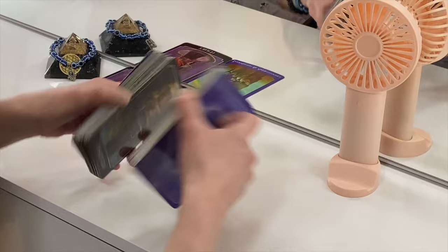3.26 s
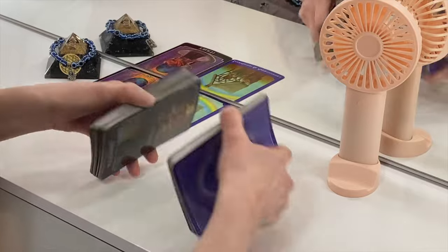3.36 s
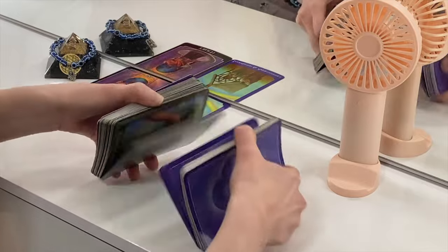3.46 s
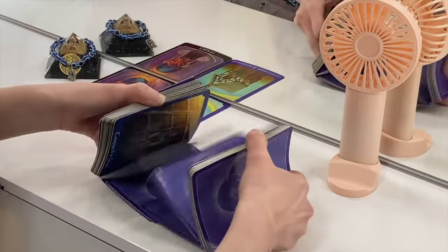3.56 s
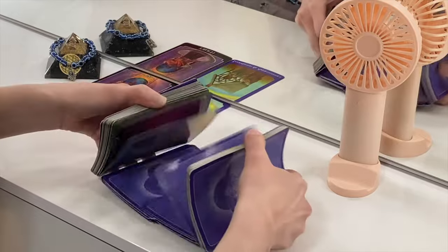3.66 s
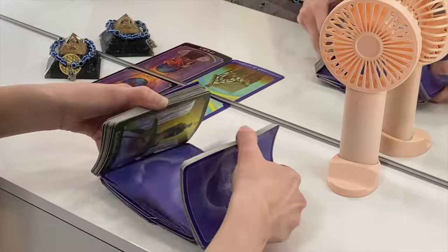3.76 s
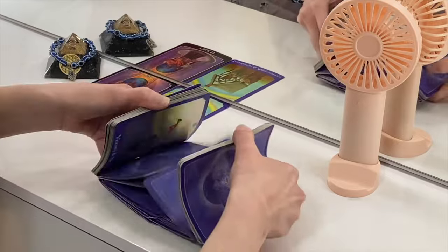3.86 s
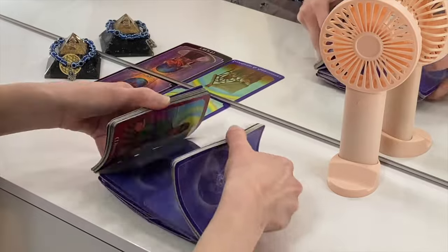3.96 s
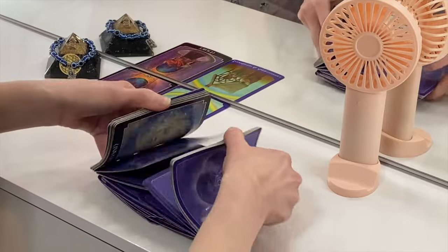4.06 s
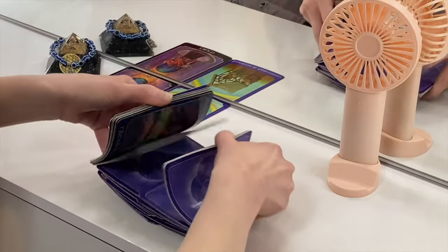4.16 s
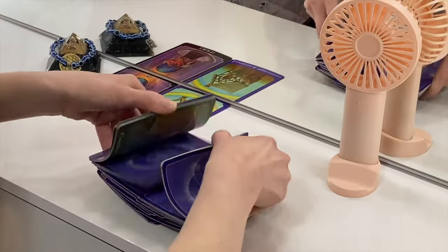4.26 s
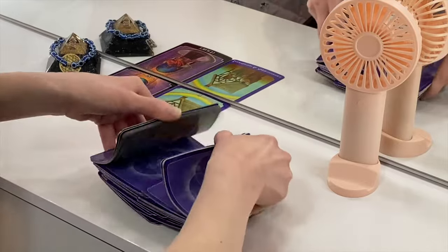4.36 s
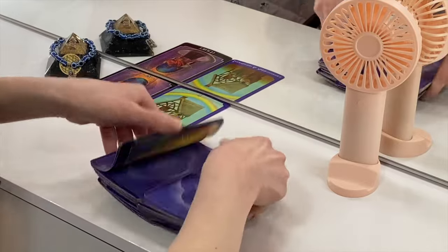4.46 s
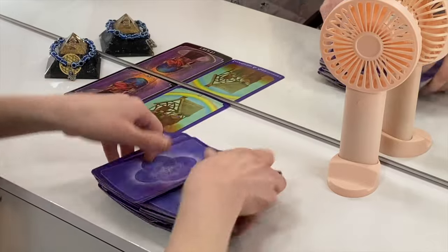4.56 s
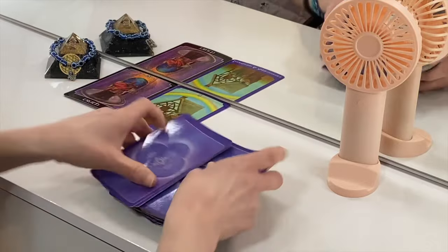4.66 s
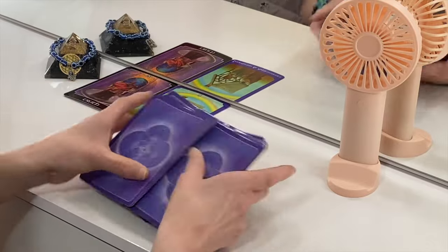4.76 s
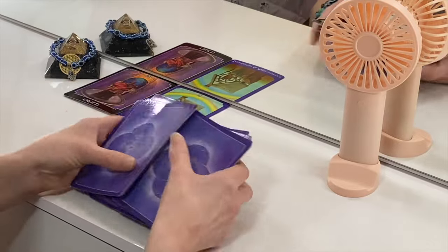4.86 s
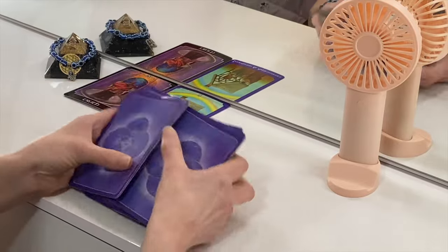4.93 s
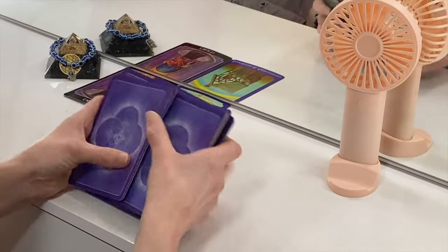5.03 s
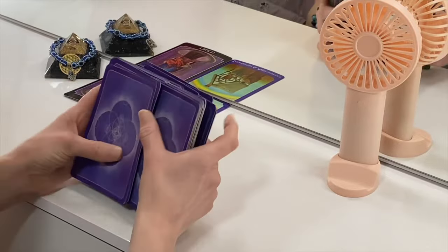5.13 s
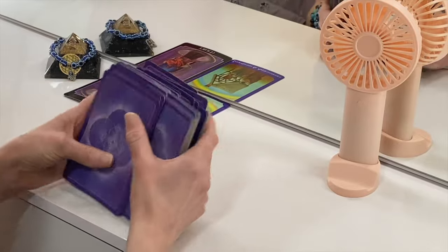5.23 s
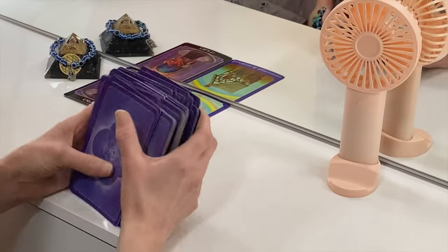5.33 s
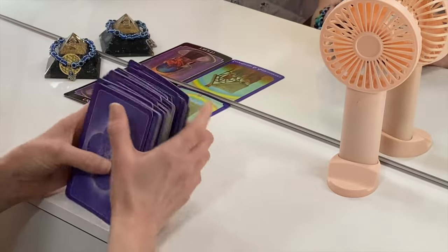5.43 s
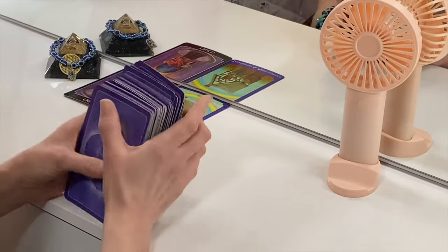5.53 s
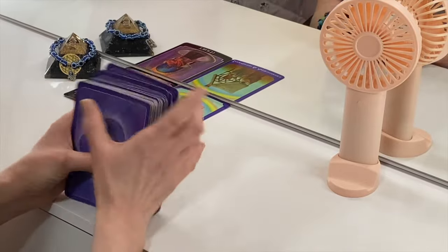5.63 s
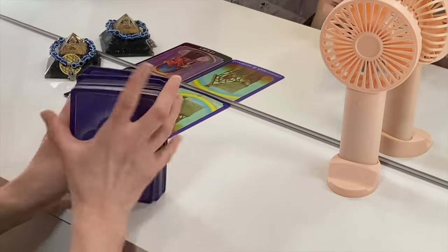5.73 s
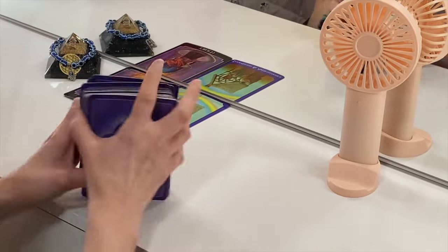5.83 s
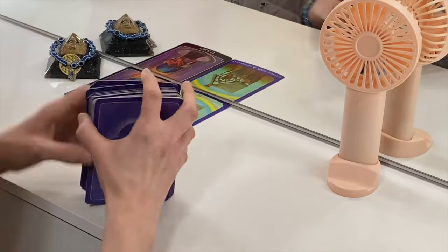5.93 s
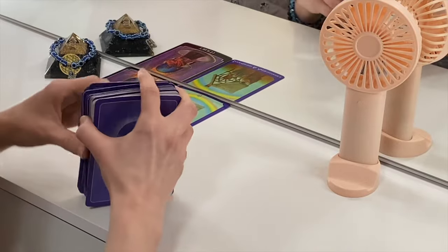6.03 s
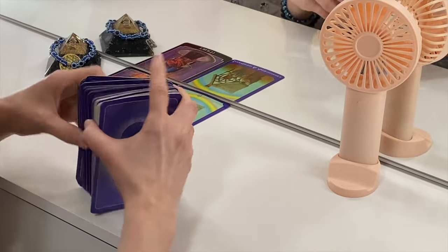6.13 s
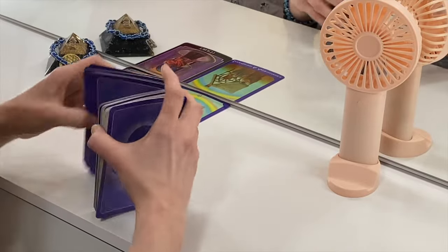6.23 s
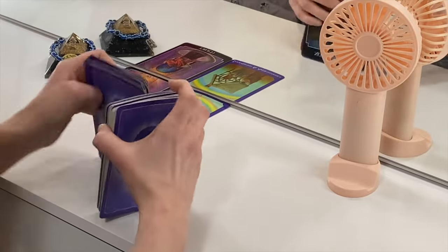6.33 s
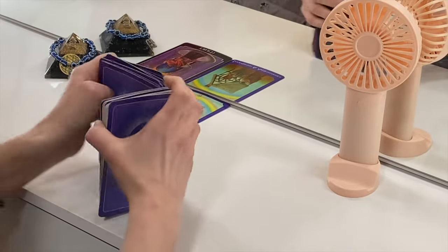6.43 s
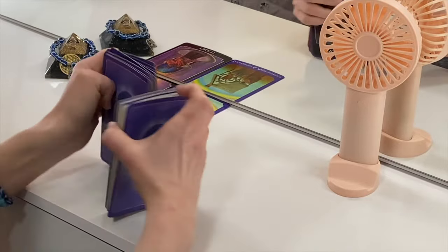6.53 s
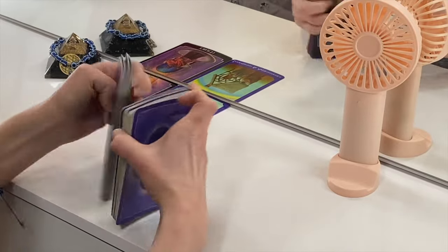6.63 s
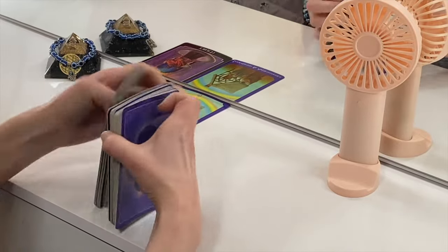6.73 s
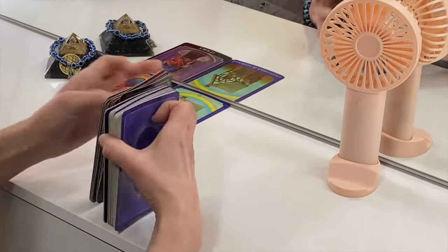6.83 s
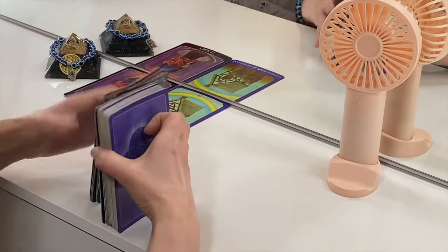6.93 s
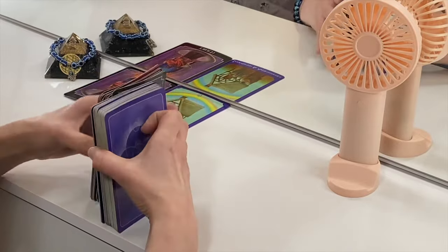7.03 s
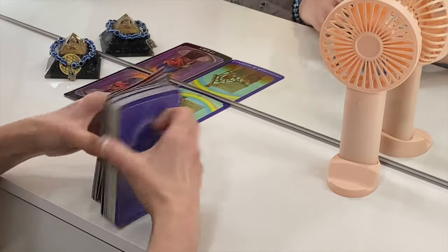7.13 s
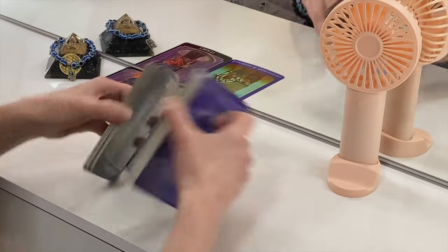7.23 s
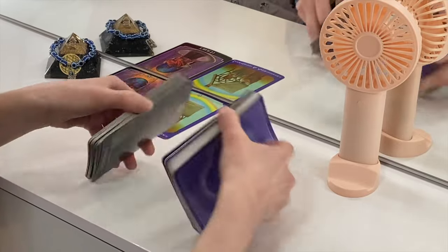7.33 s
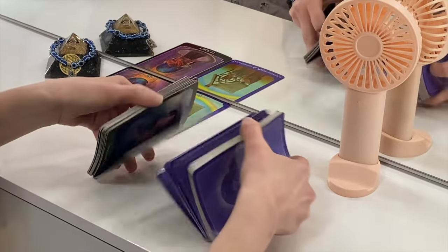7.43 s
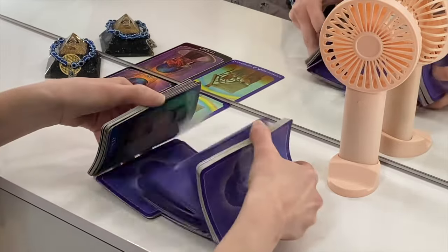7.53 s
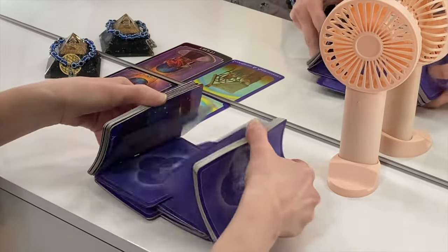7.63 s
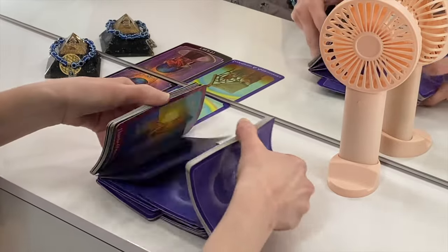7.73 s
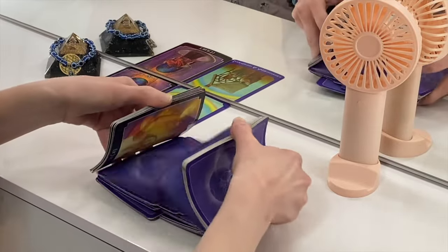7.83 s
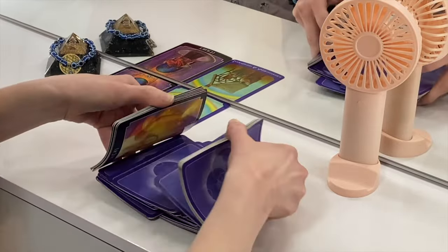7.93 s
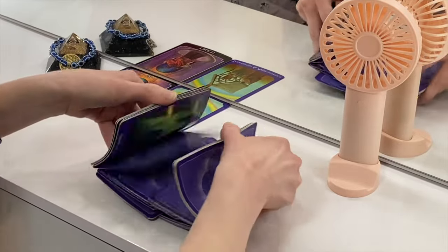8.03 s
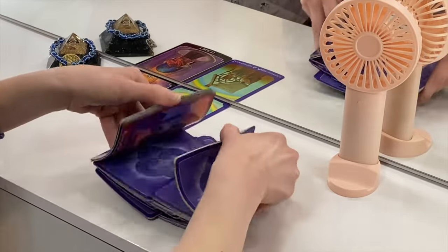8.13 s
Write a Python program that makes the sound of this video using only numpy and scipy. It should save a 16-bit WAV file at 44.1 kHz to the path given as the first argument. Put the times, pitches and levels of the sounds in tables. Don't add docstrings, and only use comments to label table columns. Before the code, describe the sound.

Stiff cards snap, riffle and slap together in bursts over a hollow desk, with soft thumps and rustling in a quiet room.

```python
import sys
import numpy as np
from scipy import signal
from scipy.fft import rfft, irfft, next_fast_len
from scipy.io import wavfile
from scipy.ndimage import uniform_filter1d

SR = 44100
rng = np.random.default_rng(int(sys.argv[2]) if len(sys.argv) > 2 else 0)


def wav_record(signal):
    frames = np.transpose(np.atleast_2d(signal))
    bounded = np.clip(frames, -1, 1)
    quanta = np.round(bounded * 32767).astype(np.int16)
    wavfile.write(sys.argv[1], SR, quanta)


def invert_db(level):
    return 10 ** (np.asarray(level, dtype=float) / 20)


N = 361179
T = np.arange(N) / SR
PAD = next_fast_len(N + SR // 4)
FREQ = np.maximum(np.fft.rfftfreq(PAD, 1 / SR), 1)


def unit(x):
    return x / np.sqrt(np.mean(x ** 2))


def respond(x, gain):
    return irfft(rfft(x, PAD) * gain, PAD)[..., :N]


def shape(x, table):
    hz, db = np.transpose(table)
    return respond(x, invert_db(np.interp(np.log(FREQ), np.log(hz), db)))


def dull(x, hz):
    return signal.lfilter(*signal.butter(2, min(hz, .45 * SR), fs=SR), x)


def steep(x, hz):
    return dull(dull(x, hz), 2.5 * hz)


def ring(x, hz, width):
    q = max(hz / width, .3)
    return signal.lfilter(*signal.iirpeak(min(hz, .45 * SR), q, fs=SR), x)


def body(x, modes):
    return sum((-1) ** k * invert_db(db) * ring(x, hz, width) for k, (hz, width, db) in enumerate(modes))


def grit(size, rough_db, grain=40):
    sizes = invert_db(rough_db * np.minimum(rng.exponential(size=size // grain + 1), 5))
    envelope = uniform_filter1d(np.repeat(sizes, grain)[:size], size=grain // 2)
    return unit(rng.standard_normal(size) * envelope)


def fade(t60, rise_s, size):
    t = np.arange(size) / SR
    return (1 - np.exp(-t / rise_s)) * invert_db(-60 * t / max(t60, .004))


def add(track, s, burst, db):
    i = int(s * SR)
    burst = burst[:N - i]
    track[i:i + len(burst)] += burst * invert_db(db) / np.abs(burst).max()


# (f/Hz, width/Hz, level/dB)
DESK = [(117.7, 23, 12), (206, 47, -3), (307, 82, -1), (411.6, 83, -2.5)]
# (f/Hz, level/dB per Hz)
EDGE = [(1700, -11), (3000, -15), (4500, 1), (7800, -6), (11000, -9), (15800, -6)]
# (f/Hz, level/dB)
DECK_TOP = [(300, 3.5), (600, -0.5), (3500, 0), (6000, -0.5), (16000, -54.5)]
# (t/s, peak level/dB, deck ring f/Hz, edge brightness/dB)
PARTING = [(0.706, -55.5, 2130, -5), (0.73, -56.5, 1980, -1), (0.974, -64.5, 2550, 15),
           (1.175, -56, 1570, -2), (1.343, -55, 2720, 11), (1.354, -33, 1310, -52), (1.364, -31, 844, -51),
           (1.401, -44, 770, -0.5), (1.414, -33, 810, -46.5), (1.619, -42, 700, -58.5),
           (1.641, -30.5, 800, -37.5), (1.659, -54, 2520, 14), (1.665, -25, 800, -34.5),
           (1.705, -32, 750, -28.5), (1.772, -26.5, 1000, -26.5), (1.783, -24.5, 2280, -28.5),
           (1.791, -34.5, 1800, -34.5), (1.842, -65.5, 2500, 18), (1.858, -36, 930, -24),
           (1.892, -34, 1690, -14), (1.97, -46, 2260, -3.5), (2.032, -49, 2400, 4)]
GRIPPING = [(2.13, -28, 1100, -14.5), (2.134, -25, 1030, -18.5), (2.221, -31.5, 876, -31.5),
            (2.339, -39, 600, -53), (2.375, -19, 2180, -24.5), (2.38, -16, 2170, -27),
            (2.431, -48, 2170, 9), (2.517, -34, 764, -31.5), (2.574, -29, 1390, -17.5),
            (2.718, -40.5, 740, -39), (2.74, -33.5, 810, -31.5), (3.007, -48, 780, -53),
            (3.075, -47.5, 752, -41.5), (3.192, -59.5, 2130, -3), (3.263, -55, 1460, 17),
            (3.434, -60.5, 2220, 5), (3.486, -56.5, 785, 3)]
RIFFLE = [(3.546, -40, 2030, -1.5), (3.558, -20.5, 2100, 0), (3.57, -24.5, 3000, -8),
          (3.638, -31, 1950, -1.5), (3.737, -41.5, 1020, 5.5), (3.757, -37.5, 750, -1.5),
          (3.829, -44, 1020, -0.5), (3.852, -35.5, 960, 4), (3.876, -13.5, 1220, -5.5),
          (3.878, -13.5, 2300, -6.5), (3.957, -24, 1290, -2), (3.986, -34, 1080, 5.5),
          (3.998, -19, 1250, 3), (4.038, -24.5, 2320, -3.5), (4.096, -25, 1120, -2), (4.11, -23.5, 2250, 1),
          (4.18, -40.5, 2170, 13), (4.199, -30, 1070, 6), (4.21, -25, 960, 0.5), (4.236, -51, 960, 22)]
FALLING = [(4.334, -39.5, 1530, 9), (4.338, -29.5, 1960, 14.5), (4.344, -13.5, 2260, 0),
           (4.384, -38, 2220, 13.5), (4.402, -25.5, 1940, 7), (4.413, -25, 2530, -3.5),
           (4.417, -19, 2700, 6.5), (4.428, -25, 2770, -11.5), (4.448, -22.5, 2050, 8.5),
           (4.454, -20.5, 2900, 5), (4.482, -19, 2300, 3.5), (4.488, -21, 2630, 2.5),
           (4.641, -37.5, 770, -4)]
SQUARING = [(4.879, -49.5, 2410, 1), (4.886, -37.5, 2220, -2.5), (4.973, -49.5, 2110, -19),
            (5.072, -35.5, 1940, -4), (5.094, -38, 1530, -1.5), (5.206, -41, 870, -4.5),
            (5.282, -21, 970, -7), (5.289, -28.5, 915, -21.5), (5.357, -37, 1060, -40),
            (5.404, -24, 1320, -31.5), (5.415, -55, 1600, 1.5), (5.428, -29.5, 2420, -2.5),
            (5.491, -26, 790, -33.5), (5.509, -34, 830, -12.5), (5.539, -12, 2440, -15),
            (5.541, -26, 990, -12.5), (5.557, -32, 2280, -5.5), (5.566, -19, 950, -25),
            (5.727, -31, 910, -44.5), (5.739, -30.5, 825, -65), (5.752, -33, 2250, -44),
            (5.85, -63.5, 614, 14), (5.878, -41, 804, -77)]
CUTTING = [(5.985, -43.5, 753, -10.5), (5.992, -30.5, 810, -41.5), (6.096, -40, 2230, -42),
           (6.142, -34, 810, -29), (6.2, -36.5, 790, -35), (6.225, -33.5, 800, -40),
           (6.249, -21, 1447, -23.5), (6.264, -21, 844, -27), (6.277, -29, 1020, -50),
           (6.295, -31, 985, -42), (6.32, -56.5, 2000, 13), (6.422, -33, 2450, -9), (6.429, -26.5, 780, -1),
           (6.58, -60.5, 1020, 17.5), (6.597, -32, 747, -86), (6.647, -41.5, 820, -7),
           (6.685, -27.5, 887, -28), (6.742, -48.5, 2010, 6.5), (6.788, -47, 2040, -1),
           (6.816, -29.5, 863, -18), (6.867, -29, 1090, -36), (6.873, -26.5, 1055, -32),
           (6.884, -34.5, 1110, -18), (6.893, -34, 1110, -17), (7.144, -28.5, 936, -32),
           (7.256, -45, 1640, 8.5)]
SECOND_RIFFLE = [(7.375, -45, 1020, -6.5), (7.476, -41.5, 1590, -1.5), (7.497, -22, 1550, 3.5),
                 (7.503, -15.5, 1760, -4), (7.525, -29, 2040, 11.5), (7.533, -17.5, 2030, -10),
                 (7.564, -26.5, 2220, 7), (7.691, -32, 1760, 9.5), (7.7, -30.5, 1040, -5),
                 (7.784, -28.5, 1850, -1.5), (7.831, -42, 580, 9), (7.847, -35.5, 990, 8.5),
                 (7.88, -31.5, 1930, 4), (7.992, -54, 694, 20), (8.008, -41, 1110, 6), (8.021, -47, 950, 9),
                 (8.038, -42, 1140, 9), (8.052, -24.5, 1100, -4), (8.101, -33, 1150, -4),
                 (8.1315, -32, 2400, 17), (8.144, -15, 2260, -2), (8.136, -15, 2300, -1)]
# (contacts, flutter t60/s, flutter level/dB under the crack)
ACTIONS = [
    (PARTING, 0.098, -7.5),
    (GRIPPING, 0.08, -11.5),
    (RIFFLE, 0.03, 1.3),
    (FALLING, 0.039, -6.5),
    (SQUARING, 0.069, -12),
    (CUTTING, 0.094, -9.5),
    (SECOND_RIFFLE, 0.1, -13),
]


def snaps():
    deck, edge, desk, size = np.zeros(N), np.zeros(N), np.zeros(N), SR // 4
    usual_db = -32.5
    contacts = [(*row, *grip) for rows, *grip in ACTIONS for row in rows]
    for s, db, hz, bright_db, t60, loose_db in contacts:
        over_db = db - usual_db
        crack_t60, rise_s = 0.0093 * invert_db(0.1446 * bright_db), 0.00055 * invert_db(0.4 * bright_db)
        crack = rng.standard_normal((2, size)) * fade(crack_t60, rise_s, size)

        flutter_db = loose_db - 0.75 * over_db
        flutter_t60 = min(t60 * invert_db(0.74 * over_db), .6)
        flutter = invert_db(flutter_db) * grit(size, rough_db=2.2) * fade(flutter_t60, 0.0013, size)
        push = crack[0] + flutter
        hardness = invert_db(0.29 * bright_db)

        pitch = ring(crack[0] + invert_db(-4.5) * flutter, hz, 0.13 * hz)
        deck_body = invert_db(-8.5) * ring(push, 1237, 1900) - invert_db(-18.0) * ring(push, 2800, 1300)
        add(deck, s, steep(pitch + deck_body, 5500 * hardness), db - .8)
        rasp = crack[1] + invert_db(-1.5) * dull(flutter, 9000)
        add(edge, s, dull(rasp, 16000 * hardness), db + bright_db + 4.0)

        desk_db = usual_db + 0.65 * over_db - 20 - 0.17 * bright_db
        add(desk, s, dull(body(push, DESK[1:]), 500), desk_db)
    return shape(deck, DECK_TOP) + shape(edge, EDGE) + desk


# (t/s, peak level/dB, f/Hz)
TICKS = [(1.3662, -26, 1300), (1.4173, -36, 1200), (1.6422, -32.5, 1170), (1.6942, -35, 1300),
         (1.7057, -25.5, 1560), (3.2635, -35.5, 6700), (3.6395, -35, 1980), (3.705, -42, 1600),
         (3.7397, -32, 4200), (3.7582, -34, 2700), (3.8768, -19.5, 2000), (3.9574, -19.5, 3050),
         (3.9898, -29.5, 1400), (3.9947, -19, 6600), (4.0015, -15, 1205), (4.0105, -24.5, 1700),
         (4.1964, -38, 1970), (4.2155, -36, 1600), (4.235, -32.5, 5060), (4.4153, -16.5, 4030),
         (4.4259, -26, 4100), (4.4326, -17, 4000), (4.4545, -9.5, 5140), (4.4825, -10, 5300),
         (4.6164, -41, 1670), (4.88, -38.5, 2100), (5.2833, -23.5, 2500), (5.4069, -20, 1505),
         (5.4142, -30.5, 1810), (5.5389, -12.5, 2450), (5.5975, -38.5, 2014), (6.295, -33, 1800),
         (6.686, -51.5, 1290), (6.8749, -23.5, 1210), (6.8849, -30, 1300), (6.8939, -22.5, 1390),
         (7.145, -26, 1400), (7.258, -36.5, 6250), (7.556, -28, 2400), (7.5659, -22, 4000),
         (7.701, -32, 1580), (7.7863, -24, 2130), (7.8493, -36, 3640), (8.008, -39, 6000),
         (8.039, -37, 5900), (8.0531, -29.5, 1400)]


def ticks():
    out, push = np.zeros(N), np.eye(1, SR // 50)[0]
    signs = rng.choice([-1, 1], size=len(TICKS))
    for (s, db, hz), sign in zip(TICKS, signs):
        width = 0.73 * hz
        click = dull(ring(ring(push, hz, width), hz, width), 2.2 * hz)
        add(out, s - .5 / hz, sign * click, db)
    return out


# (t/s, peak level/dB, ring f/Hz, desk boom level/dB)
THUMPS = [(1.362, -29.5, 322, -5.5), (1.398, -36, 186, -13.5), (1.615, -60, 363, -30),
          (1.663, -33.5, 344, -8.5), (1.924, -43, 391, -24.5), (2.133, -34.5, 335, -33),
          (2.22, -42, 566, -1.5), (2.377, -35, 287, -6.5), (2.579, -39, 315, -6.5), (7.148, -58, 298, 9.5),
          (3.076, -52.5, 378, -5), (3.559, -30.5, 289, -13), (3.873, -35.5, 573, -18.5),
          (3.995, -45, 495, -4), (4.109, -38, 300, -14.5), (4.342, -35, 443, -23.5),
          (4.456, -33.5, 297, -7.5), (4.49, -41.5, 302, -5), (5.213, -47, 320, 4), (5.286, -30, 338, -10.5),
          (5.543, -41, 307, -1.5), (5.732, -38, 338, -3), (6.084, -37, 344, -16), (6.252, -31.5, 326, -35),
          (6.594, -34, 268, -9), (6.808, -32, 337, -4.5), (7.382, -32.5, 339, -6.5), (7.502, -30, 346, -13),
          (8.05, -38, 457, -5), (8.135, -40, 353, -4.5)]


def thumps():
    desk, size = np.zeros(N), SR // 3
    for s, db, hz, boom_db in THUMPS:
        t60 = 0.092 * (320 / hz) ** 0.24
        push = rng.standard_normal((2, size)) * fade(min(t60, .7), 0.0045, size)
        knock = ring(ring(push[0], hz, 0.14 * hz), hz, 0.23 * hz)
        add(desk, s, knock + invert_db(-8.0) * body(push[0], DESK[1:]), db - 0.5)
        boom = ring(body(push[1], DESK[:1]), 110, 65)
        add(desk, s, boom, db + boom_db - 0.5)
    return desk


# (t/s, pressure as rustle level/dB, share on the edges/dB)
SLIDE = [(1.55, -94, 6), (1.8, -66, -12.5), (2.099, -79.5, 0), (2.6, -72, -12.5), (3.2, -105, 13),
         (3.521, -70, -2.5), (4.02, -55.5, 1.5), (4.31, -71.5, -2.5), (4.45, -41.5, -17), (4.75, -76, 2.5),
         (5.17, -70, -6), (5.55, -47, -13.5), (5.93, -84, 2), (6.3, -79, -11), (6.85, -60, -12),
         (7.15, -91, -3), (7.66, -60, -4), (8.19, -66.5, -3)]


def slide():
    s, *columns = np.transpose(SLIDE)
    deck_db, edge_db = (np.interp(T, s, c, left=-125) for c in columns)
    pressure = unit(uniform_filter1d(rng.standard_normal(N), size=900))
    slips = grit(N, rough_db=3.0, grain=90) * invert_db(1.0 * pressure)
    deck = unit(shape(ring(slips, 400, 880), DECK_TOP))
    edge = unit(shape(slips, EDGE))
    desk = unit(ring(body(rng.standard_normal(N), DESK), 230, 240))
    return invert_db(deck_db + 1.5) * deck + invert_db(deck_db + edge_db) * edge + invert_db(0.82 * deck_db - 11.5) * desk


# (centre t/s, spread/s, f/Hz, width/Hz, level/dB)
BRUSHES = [(0.744, .025, 3170, 3500, -79), (1.0, 0.045, 7000, 9000, -83), (1.2, 0.068, 9000, 9000, -75),
           (1.331, 0.018, 6300, 9000, -66), (2.055, 0.0096, 13000, 8000, -60.5),
           (2.369, 0.015, 8600, 9000, -62), (2.864, 0.019, 4700, 800, -77),
           (2.93, 0.013, 8200, 4070, -76.5), (4.895, 0.016, 2790, 5850, -62),
           (5.087, 0.054, 2450, 5000, -64.5), (6.737, 0.0065, 8640, 6640, -57.5)]
# (centre t/s,
# spread/s, f/Hz, width/Hz, level/dB)
SCUFFS = [(1.79, 0.0099, 2200, 2340, -45.5), (1.948, 0.021, 410, 60.3, -49),
          (2.04, 0.0072, 2260, 1200, -62), (2.379, 0.0027, 2020, 2330, -25),
          (2.715, 0.0041, 1200, 1990, -59), (2.738, 0.004, 1310, 2460, -68), (2.835, .006, 4860, 1465, -68),
          (2.975, 0.0026, 2190, 2050, -71), (3.0, 0.034, 1200, 2500, -75.5), (3.05, 0.058, 329, 298, -64),
          (3.1, 0.039, 1500, 2480, -77), (3.624, 0.0026, 3000, 6000, -41.5),
          (3.741, 0.0042, 4030, 1000, -51), (3.795, 0.0018, 9000, 9000, -59),
          (3.995, 0.0015, 6000, 9000, -40), (4.001, 0.0036, 1500, 2510, -32.5),
          (4.045, 0.0025, 2200, 1500, -40.5), (4.097, 0.0023, 5000, 8000, -50),
          (4.112, 0.0031, 2570, 4060, -40), (4.125, 0.0023, 3000, 4000, -47),
          (4.343, .004, 3000, 8100, -37), (4.344, 0.0014, 12400, 8000, -25),
          (4.418, 0.0022, 12300, 8000, -27), (4.454, 0.00066, 13000, 8000, -27.5),
          (4.482, 0.00073, 13000, 7950, -35.5), (5.363, .006, 1500, 1500, -54),
          (5.417, 0.0029, 1800, 1970, -47.5), (5.565, 0.0069, 2900, 2980, -34.5),
          (5.647, 0.0032, 1100, 996, -46), (6.297, 0.0026, 1500, 1984, -39.5),
          (6.6, 0.0022, 704, 1180, -54), (6.815, 0.0044, 1490, 2500, -45), (6.88, 0.011, 2004, 2850, -38),
          (7.688, 0.0035, 3980, 8000, -54), (7.878, 0.0045, 5000, 8000, -41), (8.07, .003, 5000, 8000, -48),
          (8.129, 0.005, 6000, 9000, -44), (8.14, 0.0039, 2250, 2520, -32.5),
          (8.145, 0.0027, 12000, 8000, -31.5),
          (1.367, 0.0022, 1290, 1480, -49), (1.621, 0.0022, 760, 700, -47), (1.859, 0.0034, 4300, 500, -65),
         (2.127, 0.0043, 2000, 2500, -62), (2.149, 0.0055, 2710, 500, -50), (2.44, .045, 2220, 198, -63),
         (4.443, 0.0036, 2220, 1190, -34), (4.491, 0.0044, 2260, 800, -38.5),
         (5.274, 0.0043, 1210, 1500, -60), (5.497, .006, 1490, 2500, -57), (5.512, .003, 2000, 2940, -53),
         (5.736, 0.0064, 923, 300, -46), (6.48, 0.0037, 600, 790, -61), (6.648, 0.0012, 980, 1500, -40),
         (7.147, 0.0036, 1480, 2000, -48), (0.73, 0.016, 2000, 1500, -74.5), (1.18, 0.033, 1500, 1500, -79),
         (1.773, 0.002, 1500, 2500, -41), (2.16, 0.016, 332, 199, -48.5),
         (2.376, 0.0012, 2120, 2490, -31.5), (2.6, .015, 334, 250, -58), (2.99, 0.021, 185.5, 120, -62.5),
         (3.957, 0.00066, 3020, 6000, -28), (4.482, 0.00049, 5040, 8000, -32),
         (5.3, 0.0092, 350, 250, -43.5), (5.408, 0.0027, 1800, 2500, -45),
         (5.538, 0.00084, 3000, 4870, -25.5), (6.3, 0.011, 12000, 8000, -64), (6.465, 0.021, 115, 50, -57),
         (7.201, 0.024, 2300, 1195, -68.5), (7.258, 0.00063, 7060, 4000, -45),
         (3.504, 0.0018, 4000, 6000, -66)]


def swishes():
    out, size = np.zeros(N), SR // 2
    for s, spread, hz, width, db in BRUSHES + SCUFFS:
        hiss = ring(ring(grit(size, rough_db=1.5), hz, width), hz, width)
        hiss = dull(dull(hiss, hz + width), hz + width)
        from_centre = np.arange(size) / SR - .25
        swell = np.exp(-.5 * (from_centre / max(spread, .0007)) ** 2)
        add(out, s - .25, hiss * swell, db + 10)
    return out


# (f/Hz, t60/s)
ROOM_T60 = [(100, 0.74), (400, 0.47), (1200, 0.16), (3000, 0.34), (7000, 0.23), (14000, 0.33)]


def room():
    tail = sum(ring(rng.standard_normal((2, SR)), hz, 1.16 * hz) * fade(t60, 0.00025, SR)
               for hz, t60 in ROOM_T60)
    tail = tail / np.sqrt(np.sum(tail ** 2, axis=1, keepdims=True))
    return np.pad(tail, ((0, 0), (150, 0)))


# (t/s, level/dB)
RUMBLE = [
    (0.0, -70.5),
    (1.71, -61),
    (3.47, -64),
    (3.53, -60.5),
    (6.41, -58.5),
    (6.61, -54.5),
    (8.19, -60.5),
]
# (f/Hz, level/dB per Hz)
AIR = [(53, -25.5), (90, 4.5), (139, -12), (396, -13), (1340, -25), (5920, -32.5), (8210, -30),
       (16500, -52)]


def hush():
    noise = rng.standard_normal((5, N))
    nearly_mono = noise[0] + 0.11 * noise[1:3]
    rumble = unit(ring(ring(nearly_mono, 60, 46), 58, 33)) * invert_db(np.interp(T, *np.transpose(RUMBLE)))
    return rumble + invert_db(-73.5) * unit(shape(noise[3:], AIR))


def scene():
    cards = snaps() + ticks() + thumps() + slide() + swishes()
    echo = signal.fftconvolve(cards[None], room(), axes=1)[:, :N]
    return cards + invert_db(-4.5) * echo + hush()


def top_cut(x):
    return signal.sosfilt(signal.butter(12, 16990, fs=SR, output="sos"), x)


# (f/Hz, side level/dB)
WIDTH = [(45, -8.5), (400, -5.5), (1300, 4), (2400, -13), (4400, -22.5), (7000, -24.5), (9000, -16),
         (16000, -3)]
# (f/Hz, lead/half turns, negative where left lags)
LEFT_LEAD = [(7600, 0), (8750, -.98), (9250, -1.02), (10200, -2), (12000, -2.1), (12850, -2.98),
             (13750, -3.02), (14500, -4)]


def record(dry):
    mid, side = (dry[0] + dry[1]) / 2, (dry[0] - dry[1]) / 2

    open_above_hz = 1300
    loudness = uniform_filter1d(np.abs(mid - dull(mid, open_above_hz)), size=500)
    opening = np.minimum(loudness / invert_db(-32), 1) ** 2
    wide = invert_db(-2.5) * opening * (side - dull(side, open_above_hz))

    turn = np.exp(.5j * np.pi * np.interp(FREQ, *np.transpose(LEFT_LEAD)))
    side = shape(side, WIDTH) + invert_db(-10.5) * wide + respond(mid, 1j * turn.imag)
    mid = respond(mid, turn.real) + respond(wide, 1j * turn.imag)
    top = signal.ellip(8, .2, 60, 15680, fs=SR, output="sos")
    ports = signal.sosfilt(top, [mid + side, mid - side])
    return top_cut(ports)


dry = scene()
out = record(dry)
wav_record(out)
```